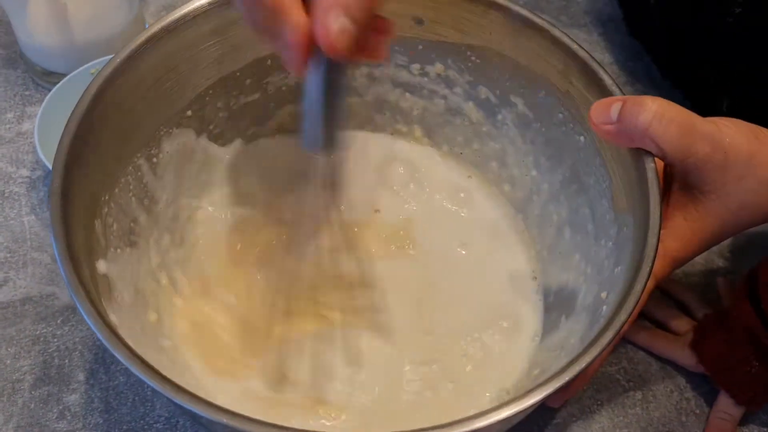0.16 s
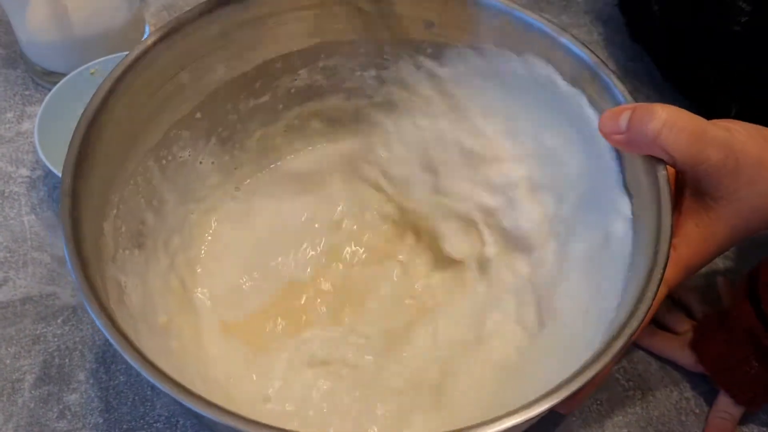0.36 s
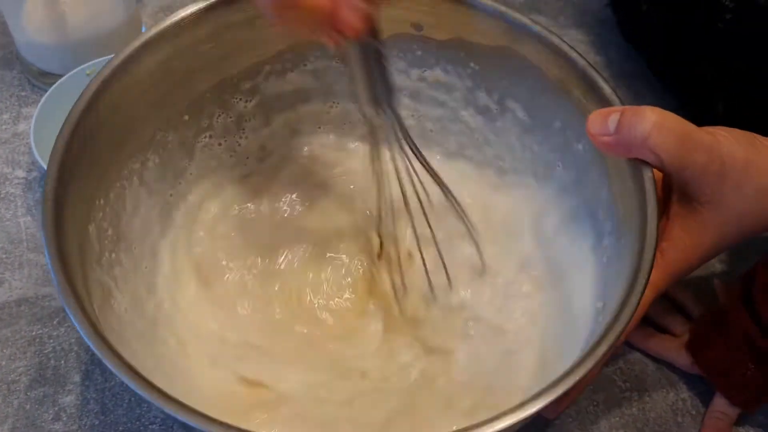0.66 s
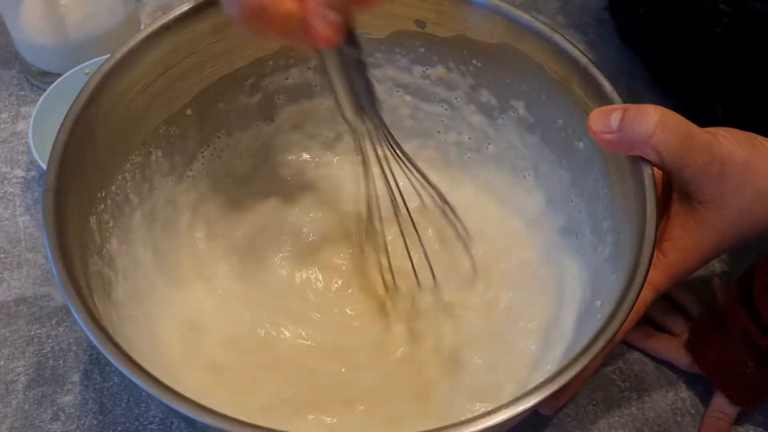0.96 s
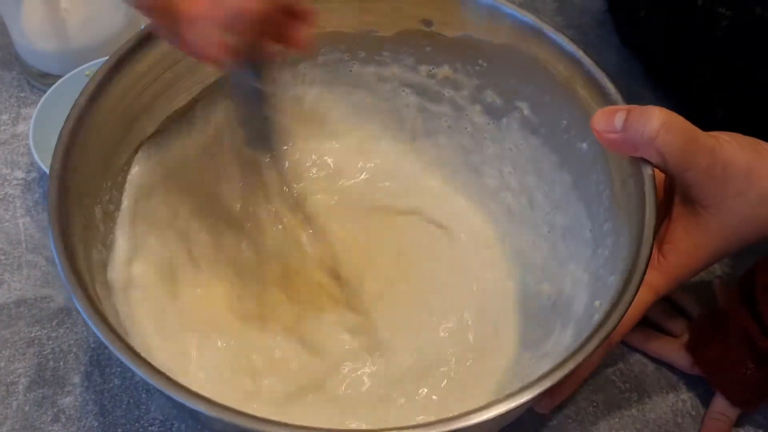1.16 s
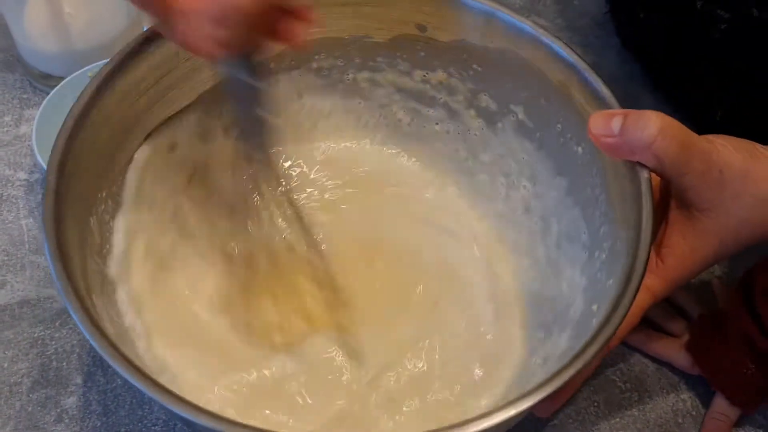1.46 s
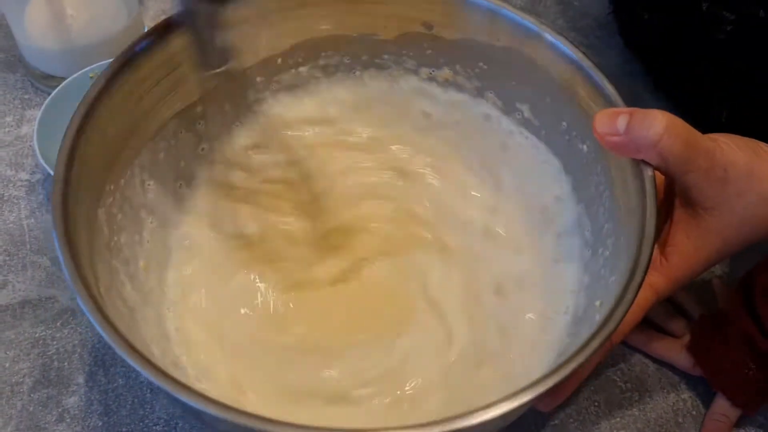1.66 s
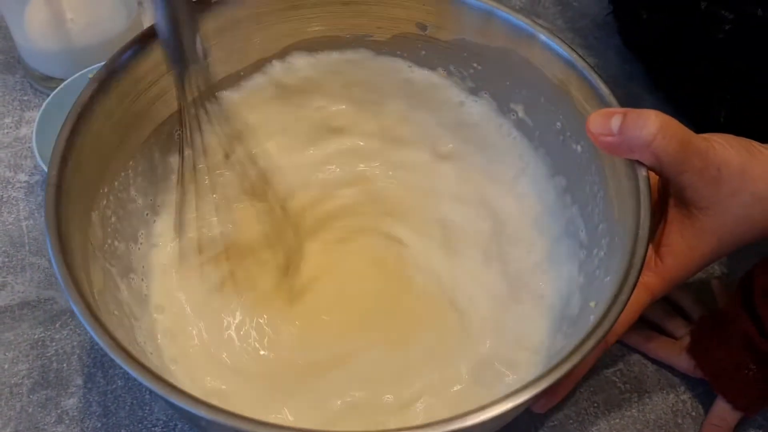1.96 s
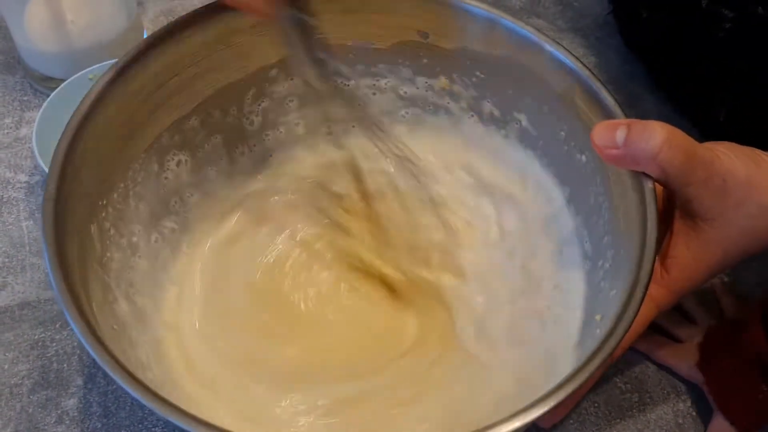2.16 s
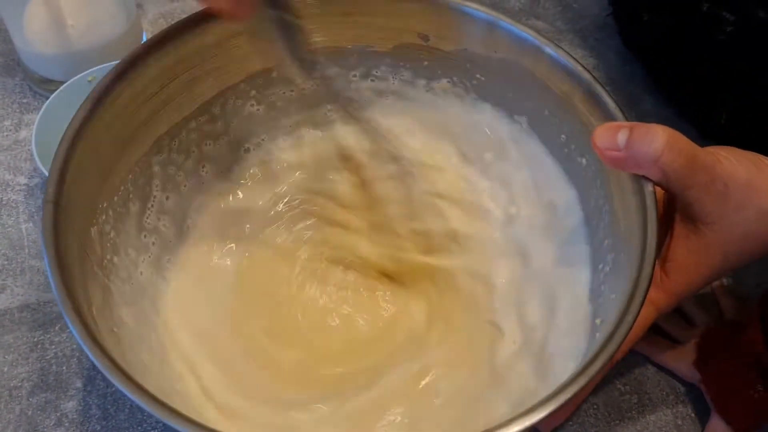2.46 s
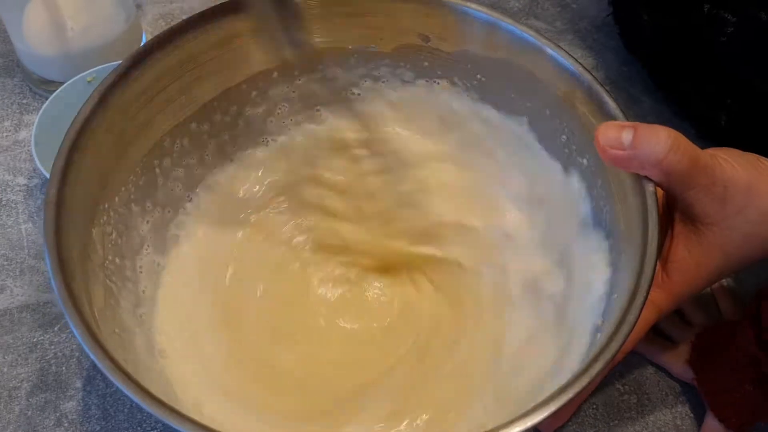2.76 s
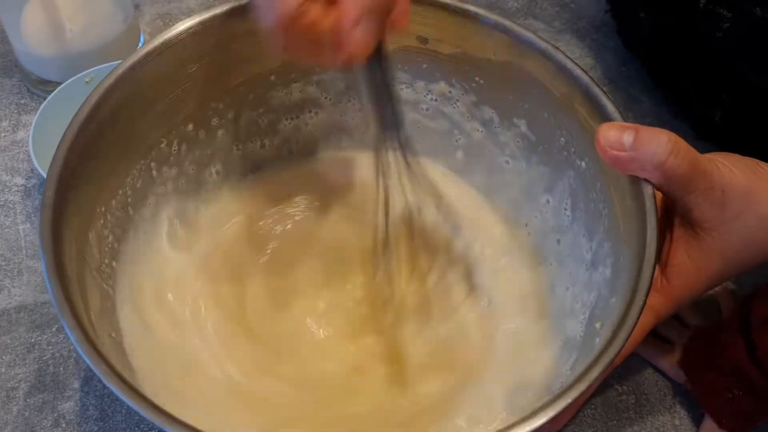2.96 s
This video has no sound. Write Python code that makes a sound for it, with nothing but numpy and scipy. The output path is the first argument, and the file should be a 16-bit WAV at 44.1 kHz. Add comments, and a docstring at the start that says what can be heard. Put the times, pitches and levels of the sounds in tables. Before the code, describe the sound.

A wire whisk beats thin batter in a steel bowl, heard close in a small kitchen with faint air noise. At 0.1 s the first plunge chirps, clinks and gulps; light wire drags follow until 0.5 s. Nine more brisk strokes run to 2.9 s, each a wet hollow gulp with hissy scraping and spatter. Slaps start near 0.57 s, deep soft thuds at 1.16 s; bright clinks ring at 2.65 and 2.96 s.

```python
"""A wire whisk beats thin batter in a hand-held steel bowl in a small kitchen, over faint air noise.
At 0.1 s the first plunge bites: wires chirp, the cage clinks and the bowl wall rings from a knock.
It is the first of ten strokes to 2.9 s, over three a second: filtered clicks scrape and spatter, sine bubbles
churn and gulp, low filtered clicks thump and ring the worktop. Wires tick, drag lightly and swirl the batter.
Batter slaps from 0.57 s, deep thuds from 1.16 s; clinks and knocks recur up to the end."""
import sys
import numpy as np
from scipy import signal
from scipy.fft import rfft, irfft
from scipy.io import wavfile
from scipy.ndimage import uniform_filter1d

SR = 44100
rng = np.random.default_rng(int(sys.argv[2]) if len(sys.argv) > 2 else 0)


def file_out(sig):
    """Save sig as 16-bit WAV at sys.argv[1]."""
    # one column per channel
    cols = np.atleast_2d(sig).T
    # limit, then scale
    lim = np.clip(cols, -1, 1)
    pcm = np.round(lim * 32767).astype(np.int16)
    wavfile.write(sys.argv[1], SR, pcm)


N = 136710
T = np.arange(N) / SR

# Source levels here and below are before the mix gains.
# whisk strokes: entry t/s, crest t/s, churn level/dB, churn f/Hz, thump level/dB, spatter level/dB,
# scrape level/dB, scrape fade/(dB/s)
STROKES = [(0.108, 0.183, -33, 333, -56.5, -48.5, -46, 149), (0.524, 0.588, -37, 365, -58, -47, -47.5, 121),
           (0.833, 0.904, -35, 411.5, -59.5, -51, -57, 145.5),
           (1.142, 1.174, -35.5, 343.5, -53, -46, -51, 83),
           (1.426, 1.493, -36.5, 316, -54.5, -49, -51.5, 71),
           (1.717, 1.776, -39, 339, -54.5, -48, -47, 148), (2, 2.066, -39.5, 346, -55.5, -44, -45, 111),
           (2.27, 2.343, -39.5, 372, -57.5, -44, -42.5, 191),
           (2.576, 2.633, -37.5, 360.5, -56, -42.5, -49.5, 48),
           (2.865, 2.92, -42, 371, -59, -45.5, -43.5, 162)]
ENTRY_S, CREST_S, CHURN_DB, CHURN_HZ, THUMP_DB, SPATTER_DB, SCRAPE_DB, SCRAPE_FADE = np.transpose(STROKES)


def from_db(db):
    """Decibels to amplitude gain."""
    return 10 ** (np.asarray(db) / 20)


def rms_one(x):
    """Scale to rms 1."""
    return x / np.sqrt(np.mean(x ** 2) + 1e-20)


def evened(x, window_s):
    """Hold a texture at rms 1 over a short window."""
    power = np.abs(uniform_filter1d(x ** 2, int(window_s * SR)))
    return x / np.sqrt(power + 1e-12)


def coloured(x, points):
    """Minimum-phase filter through (f/Hz, level/dB) points, by folding the cepstrum."""
    size = 4096
    hz, db = np.transpose(points)
    bin_hz = np.arange(size // 2 + 1) * SR / size
    wanted_db = np.interp(np.log(bin_hz + 1), np.log(hz), db)
    cepstrum = irfft(np.log(from_db(wanted_db)))[:size // 2]
    cepstrum[1:] *= 2
    impulse = irfft(np.exp(rfft(cepstrum, size)))
    return signal.fftconvolve(x, impulse)[:N]


def resonated(x, hz, q):
    """One band-pass resonance."""
    b, a = signal.iirpeak(hz, q, fs=SR)
    return signal.lfilter(b, a, x)


def ring(x, hz, t60_s):
    """Two-pole mode: a unit click starts a decaying sine of height 1."""
    radius = from_db(-60 / (t60_s * SR))
    angle = 2 * np.pi * hz / SR
    a = [1, -2 * radius * np.cos(angle), radius ** 2]
    return signal.lfilter([0, np.sin(angle)], a, x + 1e-18)


def dying(t, t60_s):
    """Exponential decay that starts at t = 0."""
    return (t >= 0) * from_db(-60 * np.clip(t / t60_s, 0, 4))


def grains(per_s, spread_db):
    """Random clicks of uneven size and sign."""
    sizes = from_db(spread_db * np.minimum(rng.exponential(1, N), 4))
    return sizes * rng.choice([-1, 1], N) * (rng.random(N) < per_s / SR)


def strike(s, db):
    """One click at s seconds."""
    return from_db(db) * (np.arange(N) == int(s * SR))


def swell(entry_s, crest_s, hold_s, fade_db_per_s):
    """One stroke: a quick bite, a rise to the crest, a hold and a fade."""
    bite = np.clip((T - entry_s) / 0.0022, 0, 1)
    to_crest = np.clip((crest_s - T) / (crest_s - entry_s), 0, 1)
    past_hold_s = np.maximum(T - crest_s - hold_s, 0)
    return bite * from_db(-6.5 * to_crest - fade_db_per_s * past_hold_s)


def stroke_force(levels_db, hold_s, fades_db_per_s):
    """Sum of all stroke envelopes at the given crest levels."""
    fades = np.broadcast_to(fades_db_per_s, len(STROKES))
    strokes = zip(ENTRY_S, CREST_S, levels_db, fades)
    return sum(from_db(db) * swell(entry, crest, hold_s, fade) for entry, crest, db, fade in strokes)


def scrape():
    """Wires stick and slip on steel: dense clicks in clumps, plus sparser catches, under strokes and drags."""
    # slip spectrum: f/Hz, density level/dB
    slip_spectrum = [(700, 3.5), (1400, -6.5), (2400, -5.5), (3300, -0.5), (4200, -3), (5500, -1.5),
                     (7000, 2.5), (8500, -1.5), (12000, 0), (15500, -1.5)]
    clump_db, clump_s = 1.74, 0.011  # rms swing, smoothing
    force = np.hypot(stroke_force(SCRAPE_DB, 0, SCRAPE_FADE), dragging())
    clicks = evened(coloured(grains(per_s=4000, spread_db=4.5), slip_spectrum), window_s=0.035)
    catches = from_db(-8.5) * rms_one(coloured(grains(per_s=160, spread_db=1), slip_spectrum))
    clumps = rms_one(uniform_filter1d(rng.standard_normal(N), int(clump_s * SR) + 1))
    return force * from_db(clump_db * clumps) * (clicks + catches)


def dragging():
    """Force of the wires dragging lightly round the wall between beats."""
    # drags: t/s, length/s, level/dB
    drag_events = [(0.294, 0.087, -49), (0.4, 0.057, -52.5), (0.474, 0.086, -47.5), (0.62, 0.086, -55),
                   (0.822, 0.015, -57.5), (1.092, 0.039, -56.5), (1.404, 0.017, -54.5),
                   (1.965, 0.05, -50.5), (2.24, 0.023, -51.5), (2.424, 0.03, -44.5), (2.531, 0.086, -54),
                   (2.713, 0.025, -46.5)]
    edge_s = 0.043
    force = 0
    for s, length_s, db in drag_events:
        inside_s = np.minimum(T - s, s + length_s - T)
        force = force + from_db(db) * np.clip(inside_s / edge_s + 0.5, 0, 1)
    return force


def churn():
    """Random bubbles near each stroke's pitch; a faint swirl throughout the beating, stronger under drags."""
    bubbles_per_s, spread_oct, cycles = 200, 0.687, 20  # cycles: ring to -60 dB
    swirl_db, swirl_hz, swirl_per_drag = -52.5, 265.8, 0.23
    draws = rng.random((2000, 3))
    starts_s = np.cumsum(2 * draws[:, 0]) / bubbles_per_s
    t = T[:SR // 8]
    bubbles = np.zeros(N + SR)
    for s, (_, detune, sign) in zip(starts_s, draws):
        if s < T[-1]:
            hz = np.interp(s, CREST_S, CHURN_HZ) * 2 ** (spread_oct * (2 * detune - 1))
            # the last draw sets both sign and size
            bubbles[int(s * SR):][:len(t)] += (2 * sign - 1) * bubble(t, hz, cycles / hz, rise_per_s=2.1)
    bubbles = bubbles[:N]
    force = stroke_force(CHURN_DB, hold_s=0.059, fades_db_per_s=165)
    beating = (T > ENTRY_S[0]) * (T < CREST_S[-1])
    swirl_force = from_db(swirl_db) * beating + swirl_per_drag * dragging()
    swirl = rms_one(ring(bubbles, swirl_hz, cycles / swirl_hz))
    return force * evened(bubbles, window_s=0.043) + swirl_force * swirl


def bubble(t, hz, t60_s, rise_per_s):
    """An air pocket swells, rings down and rises in pitch (fraction per s) as it closes."""
    phase = 2 * np.pi * hz * t * (1 + rise_per_s * t / 2)
    return np.clip(t / 0.006, 0, 1) * dying(t, t60_s) * np.sin(phase)


def gulps():
    """Big air pockets close behind the whisk, each with a weaker second resonance."""
    # gulps: t/s, f/Hz, level/dB
    gulp_events = [(0.114, 282.6, -24.5), (.146, 290, -30), (0.181, 276, -27.5), (0.569, 322, -35),
                   (.598, 337.2, -24.5), (.848, 416, -32.5), (0.885, 396, -24), (0.935, 364, -29),
                   (.985, 354, -56), (1.163, 291, -27.5), (1.235, 345, -28), (1.43, 301, -33),
                   (1.475, 311, -26.5), (1.719, 336, -37), (1.75, 274, -28.5), (1.812, 340.6, -31.5),
                   (1.997, 360, -39), (2.051, 318, -30.5), (2.072, 370, -27.5), (2.126, 364, -32.5),
                   (2.284, 366, -32.5), (2.349, 379, -27), (2.39, 369, -30.5), (2.659, 360, -34.5),
                   (2.912, 320, -31.5), (2.968, 376, -31)]
    t60_s, rise_per_s = 0.1, 0.6
    overtone_ratio, overtone_db = 2.1, -19
    t = T[:SR // 4]
    out = np.zeros(N + SR)
    for s, hz, db in gulp_events:
        pocket = bubble(t, hz, t60_s, rise_per_s)
        overtone = from_db(overtone_db) * bubble(t, overtone_ratio * hz, t60_s, rise_per_s)
        out[int(s * SR):][:len(t)] += from_db(db) * (pocket + overtone)
    return out[:N]


def spatter():
    """Drops and bursting films of batter: coloured clicks under each stroke."""
    # drop spectrum: f/Hz, density level/dB
    drop_spectrum = [(330, -14), (520, 5), (700, 2.5), (830, -10), (1100, -5.5), (1450, -11.5), (2000, -6),
                     (3200, -9.5), (5000, -13.5), (12000, -22.5)]
    force = stroke_force(SPATTER_DB, hold_s=0.015, fades_db_per_s=129)
    return force * evened(coloured(grains(per_s=1300, spread_db=2.0), drop_spectrum), window_s=0.052)


def slaps():
    """A wave of batter slaps the wall: a rounded cluster of wet mid-range pops."""
    # slaps: t/s, length/s, level/dB, f/Hz
    slap_events = [(0.57, 0.042, -55.5, 1080), (0.884, 0.04, -41, 1010), (0.896, 0.052, -55.5, 1740),
                   (1.196, 0.075, -49, 1020), (1.488, 0.013, -40.5, 1004), (1.792, 0.053, -45.5, 1075),
                   (2.655, 0.046, -48, 1054)]
    q = 4.3
    pops, out = grains(per_s=980, spread_db=15.0), 0
    for s, length_s, db, hz in slap_events:
        wet = resonated(resonated(pops, hz, q), hz, q)
        envelope = np.exp(-2 * ((T - s) / length_s) ** 2)
        out = out + from_db(db) * envelope * evened(wet, window_s=0.017)
    return out


def thumps(ring_db):
    """The mass of batter shoves the bowl against the worktop, which booms in its modes."""
    # push spectrum: f/Hz, density level/dB
    push_spectrum = [(18, -55), (52, -42), (78, -42), (105, 2), (130, 1.5), (160, 2), (200, -7), (350, -11),
                     (900, -18)]
    # bowl-on-worktop modes: f/Hz, level/dB re ring_db, T60/s
    worktop_modes = [(53, -12, .12), (110, -1, .16), (122, -2, .14), (154, 0, .35), (261, 3, .4),
                     (290, 2, .3)]
    force = stroke_force(THUMP_DB, hold_s=0.071, fades_db_per_s=154)
    push = force * evened(coloured(grains(per_s=610, spread_db=-4.5), push_spectrum), window_s=0.013)
    boom = sum(from_db(db) * ring(push, hz, t60_s) for hz, db, t60_s in worktop_modes)
    return push + from_db(ring_db) * boom


def thuds():
    """Some strokes shove the bowl: a soft, deep decaying sine."""
    # shoves: t/s, level/dB
    shove_events = [(1.163, -40), (1.224, -41), (1.81, -39), (2.08, -43), (2.36, -56)]
    hz, t60_s, swell_s = 53.4, 0.18, 0.025
    out = 0
    for s, db in shove_events:
        t = T - s
        out = out + from_db(db) * np.clip(t / swell_s, 0, 1) * dying(t, t60_s) * np.sin(2 * np.pi * hz * t)
    return out


def ticks(level_db):
    """Single wires snap against the steel: noise cracks of a few ms in a broad resonance."""
    # snaps: t/s, level/dB re level_db, f/Hz
    snap_events = [(.113, -23, 7800), (0.3578, -27, 8000), (0.382, -28.5, 10700), (.4165, -31, 8800),
                   (.452, -32.5, 5560), (0.482, -24, 5000), (0.53, -31, 8900), (.594, -23.5, 7300),
                   (0.605, -19.5, 11700), (0.6781, -24, 12300), (0.8704, -26.5, 9300),
                   (1.1112, -31.5, 6500), (1.1643, -23, 6950), (1.431, -32, 3180), (1.718, -24.5, 8360),
                   (2.068, -27, 9000), (2.243, -31, 8000), (2.28, -24, 3620), (2.4334, -44, 7960),
                   (2.622, -24, 8000), (2.869, -25, 11600), (2.937, -22, 4740)]
    out = 0
    for s, db, hz in snap_events:
        crack = rms_one(resonated(rng.standard_normal(N), hz, q=1 / 0.48))
        out = out + from_db(db + level_db) * crack * dying(T - s, t60_s=0.0093)
    return out


def chirp():
    """The first plunge makes the wires chirp: a brief burst of fast slips in one resonance."""
    centre_s, length_s, level_db = 0.12, 0.015, -36.5
    slips = rms_one(resonated(grains(per_s=5600, spread_db=7.0), hz=7200, q=4.5))
    return from_db(level_db) * np.exp(-2 * ((T - centre_s) / length_s) ** 2) * slips


def clinks(level_db):
    """The wire cage rings on the wall; modes near each strike's centre frequency speak loudest."""
    # strikes: t/s, level/dB re level_db, centre f/Hz
    cage_strikes = [(0.106, -27, 1870), (0.703, -27.5, 1840), (0.966, -31, 3500), (0.98, -29, 3760),
                    (0.993, -34, 4070), (2.2314, -28, 5040), (2.6549, -15, 2750), (2.664, -25, 3020),
                    (2.9595, -21.5, 2820)]
    # cage modes: f/Hz, level/dB, T60/s
    cage_modes = [(1735, 3, 0.02), (2210, 4, 0.0079), (2370, -1.5, 0.028), (2477, -1, 0.016),
                  (2910, -5, 0.013), (3370, 2.5, 0.006), (3886, -5.5, 0.03), (4860, 1, 0.012),
                  (5440, -5, 0.013)]
    out = 0
    for k, (hz, mode_db, t60_s) in enumerate(cage_modes):
        hits = 0
        for s, db, centre_hz in cage_strikes:
            detuning = 1 + (2 * np.log2(hz / centre_hz)) ** 2
            hits = hits + strike(s, db + mode_db + level_db) / detuning
        out = out + (-1) ** k * ring(hits, hz, t60_s)
    return out


def bowl(drops):
    """The steel wall, damped by batter and hand, rings under knocks and spattering drops."""
    # whisk knocks: t/s, level/dB
    knock_events = [(0.1125, -37), (1.148, -44), (2.659, -36.5), (2.96, -24)]
    # wall modes: f/Hz, level/dB, T60/s
    wall_modes = [(735, -20, .13), (1092, -10, .11), (1130, 0, .03), (1165, -22, .4), (1200, -27, .3)]
    drive = sum(strike(s, db) for s, db in knock_events) + from_db(-35) * drops
    return sum(from_db(db) * ring(drive, hz, t60_s) for hz, db, t60_s in wall_modes)


def kitchen_air():
    """Faint steady room noise: coloured noise at rms 1."""
    # air spectrum: f/Hz, density level/dB
    air_spectrum = [(20, -24), (55, -22), (110, 0), (260, 1), (500, -6.5), (1500, -12.5), (4500, -14),
                    (8000, -21), (16000, -16)]
    return rms_one(coloured(rng.standard_normal(N), air_spectrum))


def echoes(t60_s, dull_hz, count, length):
    """Diffuse stereo noise tails of unit mean energy per ear, alike in both ears only in the bass."""
    t = T[:length]
    mid, side = rng.standard_normal((2, count, length))
    side = signal.sosfilt(signal.butter(2, 606, "high", fs=SR, output="sos"), side)
    ears = np.stack([mid + side, mid - side], axis=1)
    b, a = signal.butter(1, dull_hz, fs=SR)
    tail = signal.lfilter(b, a, ears) * dying(t - 0.0005, t60_s)
    return tail / np.sqrt(np.sum(tail ** 2) / (2 * count))


def bowl_echoes(x):
    """Short reflections between the steel walls, crossfading to a new pattern as the whisk travels."""
    step = int(0.021 * SR)
    patterns = echoes(t60_s=0.03, dull_hz=16700, count=160, length=SR // 32)
    window = np.sqrt(np.hanning(2 * step))
    padded = np.pad(x, (step, 2 * step))
    out = np.zeros((2, N + SR))
    for i, pattern in zip(range(0, N + step, step), patterns):
        piece = signal.fftconvolve((padded[i:i + 2 * step] * window)[None], pattern, axes=1)
        out[:, i:i + piece.shape[1]] += piece
    return out[:, step:step + N]


def placed(x, left_db, lead_ms, room_db, bowl_db=None):
    """Direct sound panned by level and left-ear lead, plus kitchen and optional bowl echoes."""
    left = x * from_db(left_db / 2)
    right = np.interp(T - lead_ms / 1000, T, x) * from_db(-left_db / 2)
    tail = echoes(t60_s=0.24, dull_hz=6600, count=1, length=SR // 3)[0]
    room = signal.fftconvolve(x[None], tail, axes=1)[:, :N]
    out = np.array([left, right]) + from_db(room_db) * room
    if bowl_db is not None:
        out = out + from_db(bowl_db) * bowl_echoes(x)
    return out


def scene():
    """Whisk, batter and bowl over the faint air of the kitchen."""
    drops = spatter()
    spray = from_db(-3.0) * drops + from_db(-4.0) * slaps()
    steel = clinks(level_db=-8) + bowl(drops)
    batter = from_db(-9) * churn() + gulps()
    boom = thumps(ring_db=-44.0) + thuds()
    mix = placed(from_db(-3) * scrape(), left_db=10.5, lead_ms=0.344, room_db=0.0, bowl_db=4.5)
    mix += placed(batter, left_db=-0.5, lead_ms=0.073, room_db=-3.5)
    mix += placed(spray, left_db=-2, lead_ms=0.446, room_db=-4.5, bowl_db=-3)
    mix += placed(boom, left_db=2.0, lead_ms=0.25, room_db=-47)
    mix += placed(ticks(level_db=-8) + chirp(), left_db=9.0, lead_ms=0.402, room_db=-8.0, bowl_db=-8.5)
    mix += placed(steel, left_db=4, lead_ms=0.3, room_db=-10, bowl_db=-8)
    mix += from_db(-70.5) * placed(kitchen_air(), left_db=6.5, lead_ms=0, room_db=5.5)
    return mix


def record(dry):
    """Steep elliptic low-pass at 15.85 kHz."""
    return signal.sosfilt(signal.ellip(12, 0.1, 80, 15850, fs=SR, output="sos"), dry)


dry = scene()
out = record(dry)
file_out(out)
```